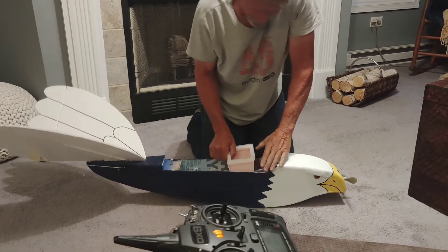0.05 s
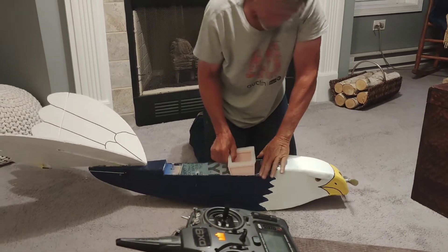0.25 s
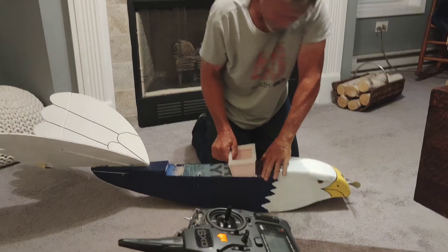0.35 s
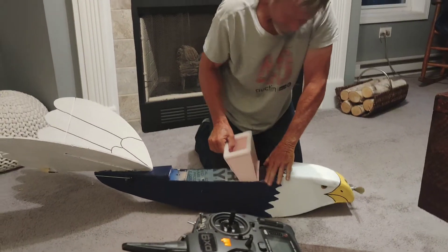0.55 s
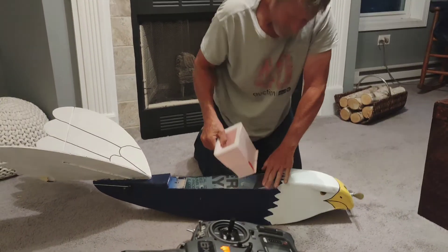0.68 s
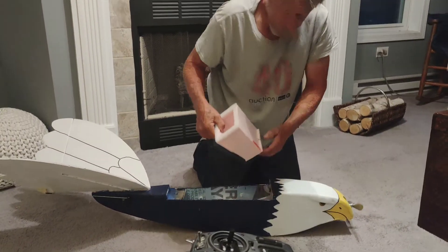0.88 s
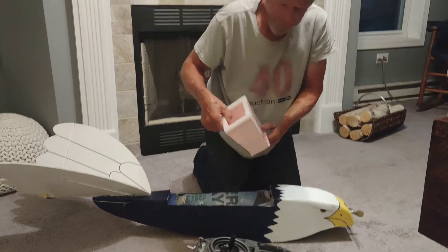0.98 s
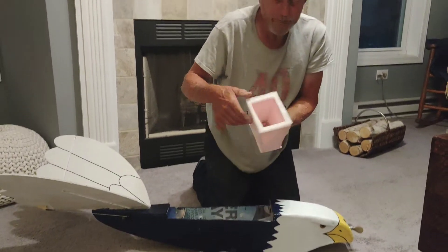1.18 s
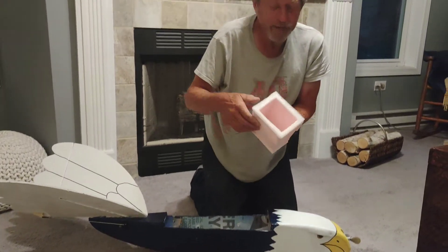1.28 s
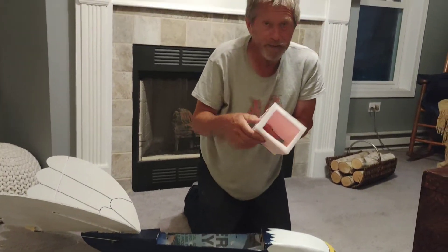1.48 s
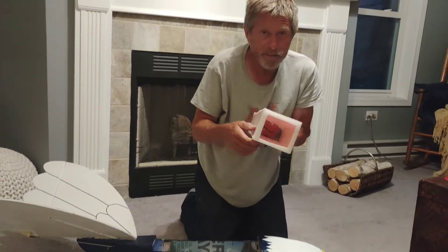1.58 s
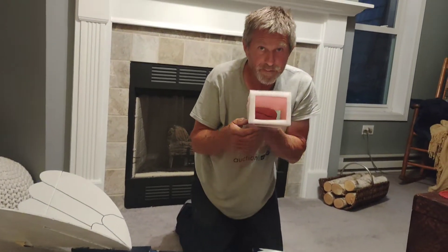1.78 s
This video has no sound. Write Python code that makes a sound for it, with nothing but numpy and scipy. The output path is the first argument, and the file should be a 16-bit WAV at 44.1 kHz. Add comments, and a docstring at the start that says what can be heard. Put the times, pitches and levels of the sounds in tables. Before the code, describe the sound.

Dry foam-on-foam scraping with sharp cracks and a hollow knock, then soft finger rubbing and ticks

```python
"""Foam box pulled free, then handled

Place: a quiet carpeted room, with faint mains hum. A foam box sticks and slips in the hollow foam body
of a model aircraft, scrapes free and leaves the body drumming; then fingers rub and tap the box.
Torn foam cells are clumped clicks that ring slot, body and box; slips, ticks and thuds are noise snaps.
Distance: direct sound is set above the room's answer. Microphone: two ports of a camera, most alike in the bass."""
import sys
import numpy as np
from scipy import signal
from scipy.fft import rfft, irfft, next_fast_len
from scipy.io import wavfile
from scipy.ndimage import uniform_filter1d, map_coordinates

SR = 44100
rng = np.random.default_rng(int(sys.argv[2]) if len(sys.argv) > 2 else 0)


def how_loud(loudness_db):
    """Turn decibels into a plain amplitude multiplier (0 dB gives 1, 20 dB gives 10)."""
    steps = np.asarray(loudness_db, float) / 20
    return 10 ** steps


def store_wav(level_fs):
    """Save 16-bit WAV to argv[1]."""
    pcm = np.round(np.clip(np.atleast_2d(level_fs), -1, 1) * 32767)
    wavfile.write(sys.argv[1], SR, pcm.T.astype(np.int16))


N = 81585  # length [samples]

# Room and microphone hiss: (frequency [Hz], relative density [dB per Hz])
AIR_SPECTRUM = [(22, -57), (43, -35), (86, -16), (117, -14), (335, -16), (566, -14), (1120, -22.5),
                (15800, -32.5)]
# Mains hum: (frequency [Hz], rms level [dB])
MAINS_HUM = [(60, -88), (119, -82)]
# Air in the slot: (time [s], pitch [Hz], level [dB])
CAVITY_TONE = [(0, 196.7, -59), (0.075, 196, -68), (0.13, 203.4, -70), (0.235, 200.2, -59),
               (0.344, 256.8, -55.5), (0.386, 246.6, -59), (0.589, 214, -53), (0.66, 232.7, -96),
               (0.698, 217.7, -53), (0.749, 200, -100)]
# The pull: (time [s], scrape level [dB], hiss level [dB], low rasp level [dB], drumming level [dB])
PULL_LEVELS = [(0, -54.5, -54.5, -68, -47), (.03, -72, -65.5, -92, -75), (.075, -70, -66.5, -83, -86),
               (.16, -60, -65, -65.5, -59.5), (.22, -58, -49.5, -56.5, -57.5),
               (.305, -48.5, -48.5, -49.5, -54.5), (.335, -39, -40.5, -35.5, -54.5),
               (.36, -38.5, -40, -43.5, -44), (.395, -34.5, -31.5, -38.5, -47.5),
               (.42, -38, -36.5, -40.5, -35.5), (.482, -47, -47, -62.5, -57.5), (.53, -53, -36.5, -88, -57),
               (.55, -63, -47, -56.5, -59), (.59, -56.5, -60, -62, -66.5), (.65, -71, -66, -83.5, -73.5),
               (.86, -83.5, -83.5, -84, -96)]
# Hiss of the scrape: (frequency [Hz], relative density [dB per Hz])
SCRAPE_HISS_SPECTRUM = [(5000, -10), (7500, -9.5), (10000, -5), (12300, -5), (13500, -10), (15900, -15)]
# Resonances of the slot, upper and lower set: (frequency [Hz], relative level [dB])
SLOT_MODES = [(3400, 5), (3730, 9.5), (4250, 7), (5100, 6.5), (6300, -8)]
SLOT_LOW_MODES = [(870, -3), (1095, 5), (1440, 1), (1640, 2.5), (2060, -2)]
# Resonances of the hollow body: (frequency [Hz], relative level [dB])
HOLLOW_MODES = [(105, 1.5), (170, 7), (230, 5.5), (310, 4), (392, -0.5), (470, -2), (615, -4.5)]
# Knocks of the freed body: (time [s], level [dB], 60 dB decay [s])
BODY_KNOCKS = [(0.395, -17, 0.066), (0.44, -31, 0.13), (0.516, -38, 0.17), (0.572, -45.5, 0.11)]
# How fast the room dies: (frequency [Hz], 60 dB decay [s])
ROOM_DECAY = [(200, 0.27), (2000, 0.24), (12000, 0.22)]
# Slips of the tight box:
# (time [s], crack peak [dB], crack centre [Hz], crack width [Hz], low part re crack peak [dB])
BOX_SLIPS = [(0.04, -42, 4560, 3000, -51), (0.0907, -47, 4430, 1500, -27), (0.1098, -44.5, 6000, 6000, -10),
             (0.1254, -38.5, 4220, 600, -52), (0.1482, -41.5, 5200, 5050, -14.5),
             (0.1724, -30.5, 4080, 2340, -12), (.2085, -53, 12000, 6000, -34), (0.23, -24, 3750, 4400, -19),
             (.683, -50, 2160, 2500, -2.5)]
# Palm thuds: (time [s], peak [dB], centre [Hz], width [Hz])
PALM_THUDS = [(.941, -60, 150, 200), (1.1475, -60, 300, 900)]
# Fingers on the box: (time [s], rub level [dB], hiss level [dB], low ring level [dB])
FINGER_LEVELS = [(.962, -92, -90, -75), (.97, -51, -55.5, -56.5), (1.028, -53, -63, -61),
                 (1.056, -66, -66, -74.5), (1.115, -58, -66, -63), (1.14, -66, -80, -67),
                 (1.175, -70, -72, -83.5), (1.208, -50, -60, -53.5), (1.264, -60, -65, -65.5),
                 (1.335, -73.5, -73, -100), (1.386, -62, -62, -58.5), (1.408, -71.5, -80, -78),
                 (1.45, -58, -62.5, -71), (1.49, -59, -60.5, -60), (1.572, -54, -53, -65),
                 (1.606, -70, -79, -77), (1.64, -74, -70, -94), (1.672, -61, -62.5, -72),
                 (1.7, -74, -67, -76), (1.73, -66, -59.5, -68), (1.775, -75.5, -74, -74.5),
                 (1.85, -70.5, -67.5, -82)]
# Hiss of the rub: (frequency [Hz], relative density [dB per Hz])
RUB_HISS_SPECTRUM = [(4500, -6), (6000, 11.5), (8300, 1), (10300, 7), (15900, -5.5)]
# Resonances of the box, upper and lower set: (frequency [Hz], relative level [dB])
BOX_MODES = [(1450, -1), (1700, 2.5), (2000, 1), (3000, -1.5), (4090, -2), (5800, -2.5)]
BOX_LOW_MODES = [(375, -5), (500, 0), (770, 0), (960, -1)]
# The grip damps one pair of low box modes or the other:
# (time [s], power share of the second and fourth modes [0-1])
GRIP_SHIFT = [(1.0, 0.4), (1.12, 0.97), (1.27, 0.97), (1.38, 0.04), (1.47, 0.97), (1.6, 0.87), (1.72, 0)]
# Nail ticks: (time [s], peak [dB], centre [Hz], width [Hz])
NAIL_TICKS = [(1.008, -38.5, 2700, 1800), (1.1478, -38, 3600, 7000), (1.2051, -39, 2100, 2200)]
# The camera turns, so the handling drifts to the centre: (time [s], left minus right [dB])
CAMERA_TURN = [(1.151, -2.5), (1.35, 0)]
# Likeness of the two ports, for the foam and for the air: (frequency [Hz], likeness [0-1])
PORT_LIKENESS = [(180, .97), (550, .9), (1650, .6), (5000, .3), (12000, .2)]
AIR_LIKENESS = [(60, 0.25), (400, 0.12)]
# Lead of the left port: (frequency [Hz], phase [rad])
LEFT_LEAD = [(500, 0), (5000, .6), (15000, .8)]
# Balance of the ports, for the pull and for the hands: (frequency [Hz], left minus right [dB])
PULL_BALANCE = [(180, -1), (550, 0), (1200, 2), (2400, -3.5), (5000, -6.5), (14000, 1.5)]
HANDS_BALANCE = [(5000, -1.1), (15000, 0.5)]

NO_LEAD = LEFT_LEAD[:1]  # both ports in step at every frequency
WIDE = .7  # full-band share of slips and ticks


def unit(x):
    """Scale to rms 1."""
    return x / np.sqrt(np.mean(x ** 2) + 1e-20)


def along(points, hz):
    """Read (frequency [Hz], value) points on a log frequency axis."""
    f, v = np.transpose(points)
    return np.interp(np.log(hz + 1), np.log(f + 1), v)


def curves(rows):
    """Gain per sample for each dB column; -120 dB outside the table."""
    s, *cols = np.transpose(rows)
    t = np.arange(N) / SR
    return [how_loud(np.interp(t, s, c, left=-120, right=-120)) for c in cols]


def filtered(x, response):
    """Multiply the spectrum of x by a response of frequency."""
    m = next_fast_len(N + SR // 2)
    return irfft(rfft(x, m) * response(np.fft.rfftfreq(m, 1 / SR)), m)[..., :N]


def ringing(peaks, q):
    """Causal sum of resonances of one sharpness q (centre over width), mean power 1."""
    def response(f):
        h = 0
        for k, (centre, db) in enumerate(peaks):
            width_term = 1j * f * centre / q
            # neighbours have opposite signs
            h = h + (-1) ** k * how_loud(db) * width_term / (centre * centre - f * f + width_term)
        return h / np.sqrt(np.mean(abs(h) ** 2))
    return response


def colour(points):
    """Gain of a noise spectrum, mean power 1."""
    return lambda f: unit(how_loud(along(points, f)))


def patchy(x, depth_db):
    """The contact wanders, so narrow bands of colour come and go."""
    z = signal.stft(x, nperseg=512)[2]
    field = rng.standard_normal(z.shape[1:])
    field = uniform_filter1d(field, size=2, axis=0)  # over frequency
    field = uniform_filter1d(field, size=7, axis=1)  # over time
    return unit(signal.istft(z * how_loud(depth_db * unit(field)), nperseg=512)[1][:, :N])


def grains(rate, spread_db, clump_db, patch_db):
    """Two streams of foam cells tearing loose: tiny clicks of uneven size, in clumps; rate per second."""
    knots = rng.standard_normal(int(N * 150 / SR) + 4)
    clumps = how_loud(clump_db * map_coordinates(knots, [np.arange(N) * 150 / SR]))
    struck = rng.random(N) < rate / SR
    size = how_loud(spread_db * rng.exponential(size=N)) * struck
    return patchy(size * clumps * rng.standard_normal((2, N)), patch_db)


def burst(s, db, t60, attack_s):
    """Envelope of one short event: quick rise, exponential decay."""
    t = np.clip(np.arange(N) / SR - s, 0, None)
    return how_loud(db - 60 * t / max(t60, .002)) * (1 - np.exp(-t / attack_s))


def cracks(rows, t60, attack_s, wide=0):
    """Short noise snaps in one steep resonance over a share of full-band click, brought to their peaks."""
    def steep(hz, width):
        def response(f):
            h = ringing([(hz, 0)], hz / width)(f) ** 2
            return h / np.sqrt(np.mean(abs(h) ** 2)) + wide
        return response

    total = 0
    for s, db, hz, width, *_ in rows:
        noise = rng.standard_normal((2, N)) * burst(s, 0, t60, attack_s)
        snap = filtered(noise, steep(hz, width))
        total = total + how_loud(db) * snap / abs(snap).max(axis=1, keepdims=True)
    return total


def ports(pair, alike, side_db, lead):
    """Mix two streams into left and right ports, with likeness, balance and lead by frequency."""
    def shares(f):
        angle = np.arccos(np.clip(along(alike, f), -1, 1)) / 2
        return np.array([np.cos(angle), np.sin(angle)])

    def tilts(f):
        tilt = how_loud(along(side_db, f) / 2) * np.exp(.5j * along(lead, f))
        return np.array([tilt, 1 / tilt])

    common, opposed = filtered(pair, shares)
    return filtered(np.array([common + opposed, common - opposed]), tilts)


def air():
    """Quiet noise of room and microphone, with steady sines of mains hum equal in both ports."""
    hiss = how_loud(-71) * filtered(rng.standard_normal((2, N)), colour(AIR_SPECTRUM))
    hum = 0
    for hz, db in MAINS_HUM:
        phase = 2 * np.pi * (hz * np.arange(N) / SR + rng.random())
        hum = hum + np.sqrt(2) * how_loud(db) * np.sin(phase)
    return ports(hiss, AIR_LIKENESS, [(100, -2.4)], NO_LEAD) + hum


def cavity():
    """Air trapped in the slot sounds one gliding tone, unsteady in strength and phase."""
    s, hz, db = np.transpose(CAVITY_TONE)
    t = np.arange(N) / SR
    # random knots, 30 per second, for the real and imaginary parts
    where = [np.repeat([[0], [1]], N, axis=1), np.tile(t * 30, (2, 1))]
    waver = map_coordinates(rng.standard_normal((2, 60)), where)
    carrier = np.exp(2j * np.pi * np.cumsum(np.interp(t, s, hz)) / SR)
    tone = carrier * (1 + .3 * (waver[0] + 1j * waver[1]))
    return np.sqrt(2) * tone.imag * how_loud(np.interp(t, s, db, right=-120))


def slot_scrape(cells, settle, low):
    """Tearing cells ring the slot walls, hiss, and rasp in the lower slot modes."""
    scrape, hiss, rasp, _ = curves(PULL_LEVELS)
    return (filtered(cells * (scrape + settle), ringing(SLOT_MODES, 7.7))
            + filtered(cells * (hiss + how_loud(3) * settle), colour(SCRAPE_HISS_SPECTRUM))
            + filtered(cells * (rasp + low), ringing(SLOT_LOW_MODES, 4.7)))


def body_drumming(cells, low):
    """Scrape drums the body's upper modes; knocks and slips drive all of them with noise."""
    drum = curves(PULL_LEVELS)[3]
    knock = sum(burst(s, db, t60, 0.002) for s, db, t60 in BODY_KNOCKS)
    noise = rng.standard_normal((2, N))
    return (filtered(cells * drum, ringing(HOLLOW_MODES[4:], 6.6))
            + filtered(noise * (knock + low), ringing(HOLLOW_MODES, 6.6)))


def room(x):
    """Diffuse answer of the room: noise tail in which each frequency dies at its own speed."""
    hz, t, z = signal.stft(rng.standard_normal((2, SR // 2)), SR, nperseg=256)
    decay = how_loud(-60 * t / along(ROOM_DECAY, hz)[:, None])
    tail = signal.istft(z * decay, SR, nperseg=256)[1]
    delayed = np.pad(x, (250, 0))[None]  # 250 samples late
    return signal.fftconvolve(delayed, tail / np.linalg.norm(tail[0]), axes=1)[:, :N]


def slip_envelopes():
    """Each slip leaves a decaying rustle of cells and a low part."""
    t60 = 0.061  # s
    settle = sum(burst(s, peak - 16, t60, 0.00071) for s, peak, *_ in BOX_SLIPS)
    low = sum(burst(s, peak + low_db, t60, 0.00067) for s, peak, _, _, low_db in BOX_SLIPS)
    return settle, low


def slip_cracks():
    """The tight box lets go suddenly in sharp snaps."""
    return cracks(BOX_SLIPS, t60=0.017, attack_s=.0013, wide=WIDE)


def pull():
    """The box leaves the body: one stream pair of cells feeds scrape and drumming, under slips and air tone."""
    cells = grains(9000, spread_db=1.5, clump_db=1.8, patch_db=2.2)
    settle, low = slip_envelopes()
    return slot_scrape(cells, settle, low) + slip_cracks() + body_drumming(cells, low) + cavity()


def palm_thuds():
    """The palm lands softly: low snaps without full-band click."""
    return cracks(PALM_THUDS, t60=0.025, attack_s=0.0016)


def skin_rub():
    """Skin drags over the box: grains ring its modes and hiss, and strong hiss turns airy."""
    rub, hiss, low = curves(FINGER_LEVELS)
    t = np.arange(N) / SR
    grip = np.clip(np.interp(t, *np.transpose(GRIP_SHIFT)), 0, 1)
    airy = hiss * (hiss / how_loud(-54.5)) ** (2.6 - 1)
    cells = grains(12000, spread_db=1.5, clump_db=1, patch_db=2)
    return (filtered(cells * rub, ringing(BOX_MODES, 6.4))
            + filtered(cells * hiss, colour(RUB_HISS_SPECTRUM))
            + filtered(cells * airy, ringing([(14100, 0)], 6.3))
            + filtered(cells * low * np.sqrt(grip), ringing(BOX_LOW_MODES[1::2], 10))
            + filtered(cells * low * np.sqrt(1 - grip), ringing(BOX_LOW_MODES[::2], 10)))


def nail_ticks():
    """A nail taps the foam: very short snaps over a full-band click."""
    return cracks(NAIL_TICKS, t60=0.0073, attack_s=0.0005, wide=WIDE)


def fingers():
    """Hands on the freed box: thuds, rubbing and ticks."""
    return palm_thuds() + skin_rub() + nail_ticks()


def scene():
    """Pull, then hands, in the room; small foam parts send out little deep bass."""
    low_cut_hz, room_db = 70, -8.5
    sources = np.array([pull(), fingers()])
    pulled, handled = filtered(sources, lambda f: (1j * f / (low_cut_hz + 1j * f)) ** 2)
    pulled = pulled + how_loud(room_db) * room(pulled[0])
    handled = handled + how_loud(room_db) * room(handled[0])
    turn = np.interp(np.arange(N) / SR, *np.transpose(CAMERA_TURN)) / 2
    pull_ports = ports(pulled, PORT_LIKENESS, PULL_BALANCE, LEFT_LEAD)
    hand_ports = ports(handled, PORT_LIKENESS, HANDS_BALANCE, NO_LEAD) * how_loud([turn, -turn])
    return pull_ports + hand_ports + air()


def band_limit(x):
    """A steep low-pass at the top of the band."""
    return signal.sosfilt(signal.butter(12, 16340, fs=SR, output="sos"), x)


def record(dry):
    """The microphone's band limit: nothing from 15.9 kHz up passes the filter."""
    mix = filtered(dry, lambda f: f < 15900)
    return band_limit(mix)


dry = scene()
out = record(dry)
store_wav(out)
```